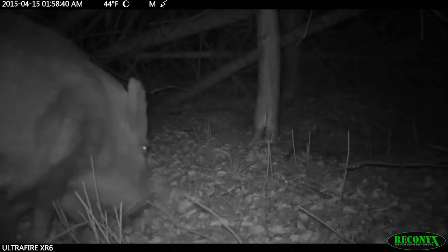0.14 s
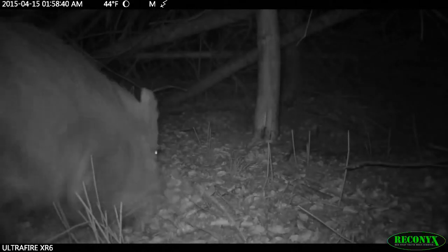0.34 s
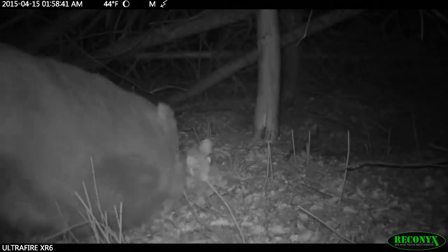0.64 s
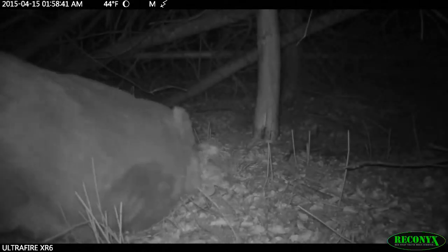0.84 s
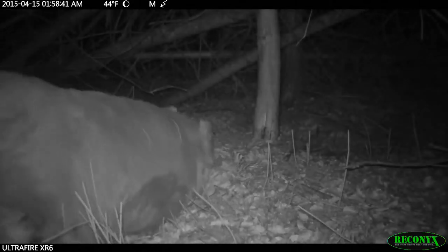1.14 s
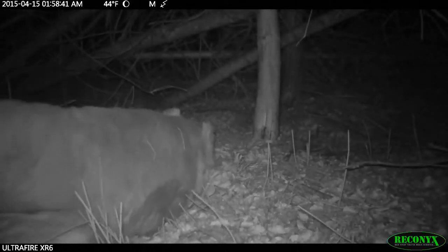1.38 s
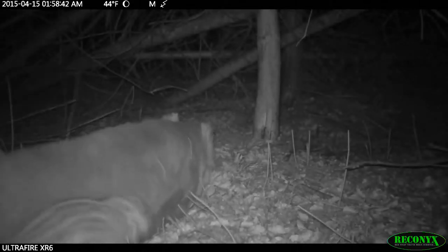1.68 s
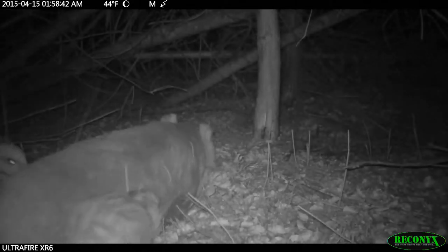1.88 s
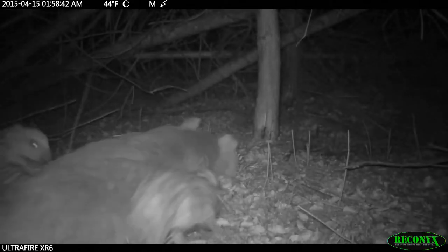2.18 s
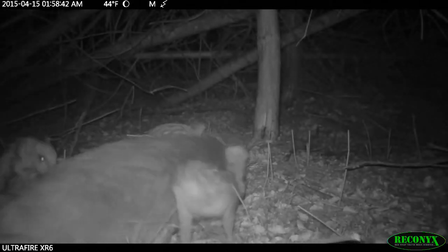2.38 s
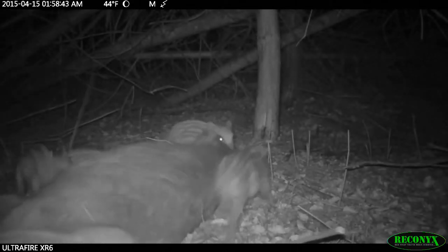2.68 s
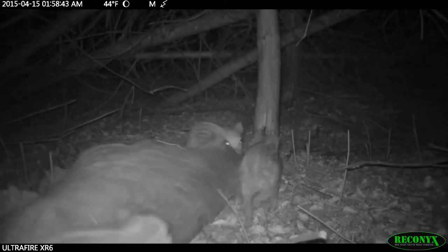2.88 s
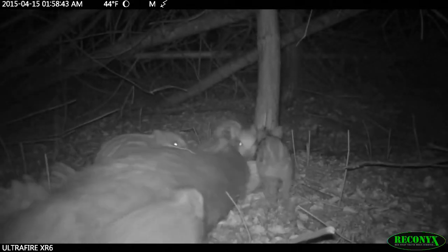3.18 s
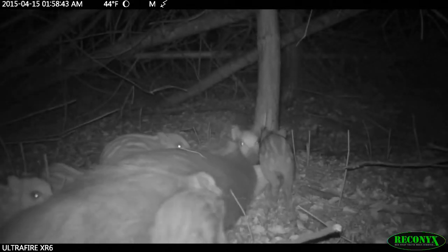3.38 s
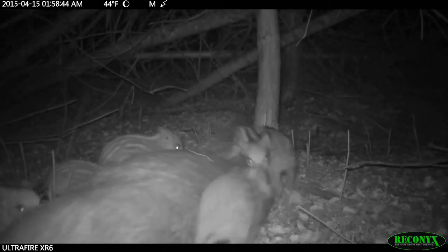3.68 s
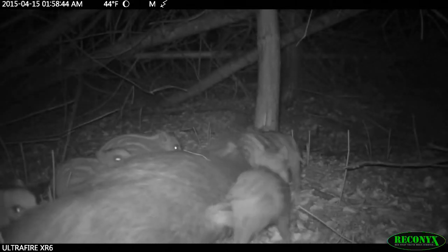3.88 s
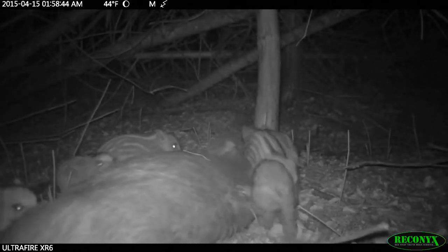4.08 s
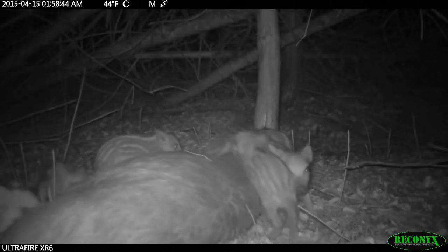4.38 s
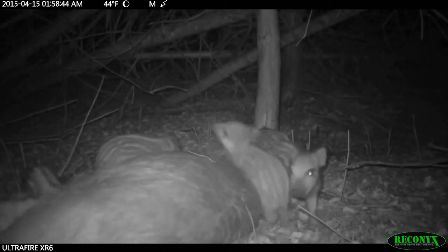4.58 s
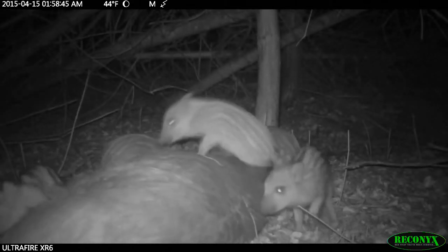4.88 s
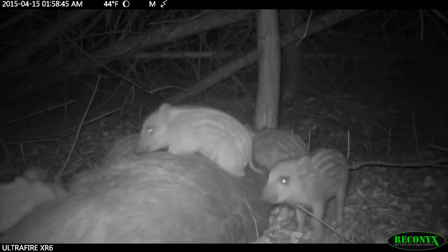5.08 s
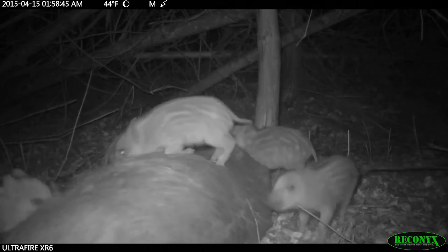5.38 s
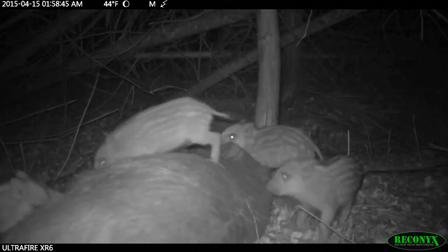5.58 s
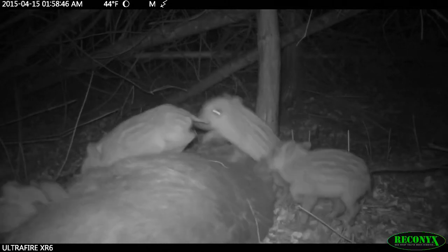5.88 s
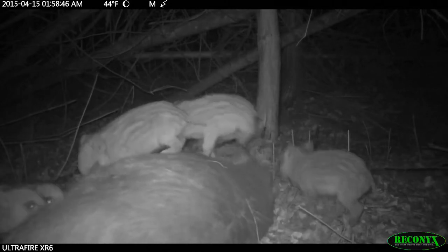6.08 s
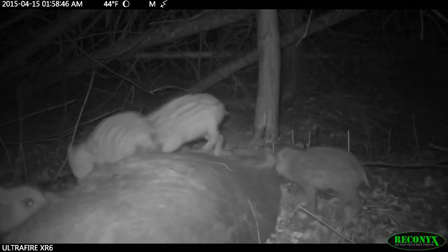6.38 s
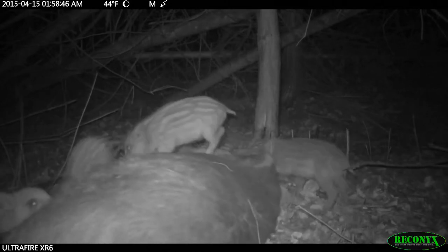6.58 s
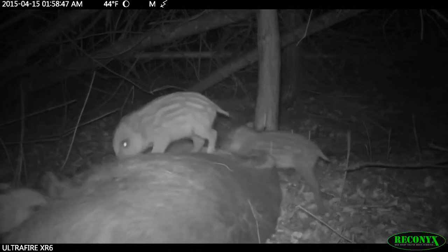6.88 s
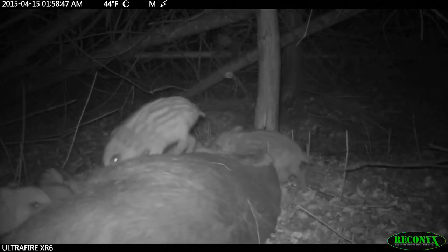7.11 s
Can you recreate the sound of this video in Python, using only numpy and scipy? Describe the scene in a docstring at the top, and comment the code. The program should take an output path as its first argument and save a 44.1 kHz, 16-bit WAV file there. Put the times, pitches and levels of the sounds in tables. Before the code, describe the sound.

Close, bright rustling of dry leaves as wild pigs root and settle on a forest floor. Hooves crush leaves in abrupt bursts and brittle twigs crack, busiest in the middle and harsh at the loudest peaks. Faint throaty sow grunts come in brief pulses early, with a slower creaky one late. Activity falls to scattered rustles and ticks over constant hiss and low air noise, with only a very short woodland tail.

```python
"""A wood at night: a sow and her piglets shuffle through dry leaves a step from a two-port microphone.
Leaves are thousands of snaps of a cycle or two; hooves crush many at once, in crunches that stop short.
Twigs break as ring, fizz, knock and splinters. The sow grunts low: fold pulses ring chest and throat.
Ground, bodies and trunks add a short scattered tail; slow air and circuit hiss lie beneath."""
import sys
import numpy as np
from scipy import signal
from scipy.fft import rfft, irfft
from scipy.io import wavfile
from scipy.ndimage import uniform_filter1d

SR = 44100
rng = np.random.default_rng(int(sys.argv[2]) if len(sys.argv) > 2 else 0)


def file_out(sig):
    """Save sig as 16-bit WAV at sys.argv[1]."""
    # one column per channel
    cols = np.atleast_2d(sig).T
    # limit, then scale
    lim = np.clip(cols, -1, 1)
    pcm = np.round(lim * 32767).astype(np.int16)
    wavfile.write(sys.argv[1], SR, pcm)


N = 319725

# shuffles of hooves and snouts: (time of height [s], level [dB], time to sink 10 dB [s], at least 0.01)
SHUFFLES = [(.13, -19.5, 0.12), (0.401, -19, 0.19), (.59, -19.5, 0.27), (.71, -18.5, -0.13),
            (.85, -16, 0.1), (.95, -16, -0.17), (1.25, -22, 0.26), (1.48, -15.5, 0.07), (1.7, -14.5, 0.19),
            (1.8, -19.5, 0.19), (1.924, -18.5, 0.02), (2.03, -20, 0.32), (2.28, -14.5, 0.16),
            (2.488, -10.5, 0.0154), (2.539, -14.5, 0.19), (2.76, -21.5, 0.1), (2.83, -16, 0.14),
            (2.89, -14, 0), (3.052, -15, 0.04), (3.2, -12.5, 0.0331), (3.331, -16.5, 0.01),
            (3.54, -18, 0.06), (3.75, -12.5, 0.0645), (3.89, -19, 0.08), (3.95, -19.5, 0.07),
            (4.06, -24.5, 0), (4.21, -25.5, 0.09), (4.44, -30.5, 0.25), (4.598, -20.5, 0.06),
            (4.84, -27, 0.28), (4.93, -25, 0.08), (5.265, -27, 0.13), (5.58, -29.5, 0.12), (5.71, -29, 0.1),
            (5.82, -21.5, 0.04), (6.0, -24, 0.055), (6.41, -32, 0.07), (6.6, -28.5, 0.03),
            (6.78, -28, 0.16), (7.2, -27.5, 0)]
# small stirring that never stops, dying down as the herd settles: (time [s], level [dB])
STIRRING_BED = [(0, -25), (.2, -23), (.33, -26.5), (1.15, -23.5), (1.4, -31), (3.25, -24.5), (3.44, -27),
                (4.7, -33), (5.1, -27.5), (5.45, -32.5), (6.25, -29.5), (6.5, -35), (7.05, -39.5),
                (7.25, -34)]
# where the stirring is: (time [s], left minus right [dB], lead of the left port [us])
STIRRING_PLACE = [(0, -2, 66), (1.5, -1.5, 58.5), (2.9, 0.2, 51), (3.1, 0, 5), (4.04, 0.5, 1.5),
                  (4.7, 0, 6.5), (5.0, -1, 57), (6.0, 0, 42), (6.9, -0.5, 28), (7.25, -.5, -6)]
# thinnest leaf snaps: (time [s], level [dB])
THIN_SNAPS = [(0, 0.5), (1.5, 0.5), (4, -3), (4.8, -1.5), (7.25, -4)]
# leaf litter's colour with the housing's ring: (frequency [Hz], relative level [dB per Hz])
LITTER_COLOUR = [(110, -56.5), (170, -20), (360, -19), (800, -23.5), (1540, -14), (2270, -17.5),
                 (2860, -12), (3620, -13.5), (4650, -10), (5900, -2), (6600, 0.5), (7800, -3.5),
                 (10100, -11), (14600, -15), (15500, -22)]
# crunches under hooves: (time [s], level [dB], weight of the thick snaps [dB])
CRUNCHES = [(0.9017, -18, 1), (1.0984, -27, -14), (1.6773, -12, -8), (1.926, -5.5, -9.5),
            (2.3338, -4.5, -0.5), (2.4743, -4.5, -14), (2.843, -6, -10), (2.8689, 4, -4),
            (3.048, -7.5, -10), (3.0978, -6, -13), (3.1799, -7, -9), (3.321, -6.5, -5.5),
            (3.651, -12.5, -2.5), (3.7345, -4, -3), (3.8004, -3, 1), (3.927, -12, -6), (3.9443, -4.5, -6),
            (3.9805, -5, -5.5), (4.0313, -14.5, 2), (4.196, -13, -1), (4.299, -16, -6), (4.5489, -12, -1),
            (5.263, -11.5, 0), (5.742, -15.5, 2), (6.0677, -18.5, -12)]
# breaking twigs: (time [s], level [dB], ring [Hz], left minus right [dB], share of brittle fizz [0-1])
TWIGS = [(0.473, 1, 5850, 1.5, 0.3), (1.6787, 2, 6100, 3, 0), (1.708, 5, 6580, 2, 0.3),
         (1.8722, -7, 6720, -1.5, 0.1), (2.0749, -2, 6660, 4, 0.06), (2.0926, -11, 6550, 0, 0.3),
         (2.1033, -5, 6290, 2, 0.2), (2.1236, -4.5, 4480, -1, 0.5), (2.2535, -4.5, 9040, -2.5, 0.2),
         (2.3697, -6, 6160, 1, .3), (2.4874, -1, 6400, 1, 0), (2.812, -5, 7320, 3, 0.14),
         (2.8953, -5, 5510, 0, 0.1), (2.8999, -4, 6370, -1, .3), (3.0485, -1.5, 6460, 2, 0.05),
         (3.0634, -5, 6720, 1, 0.1), (3.0777, -1.5, 6300, -1, .1), (3.1053, -3.5, 6120, 6, .1),
         (3.1978, -2, 5830, 2, 0.15), (3.207, -2, 6290, 0, 0), (3.5772, -2, 6000, 2, 0.3),
         (3.6879, -4.5, 7060, 4, 0.4), (3.7355, 7, 6840, 1, 0.45), (3.8869, -9, 5940, 1, .3),
         (3.955, -3, 6980, 3, 0.2), (3.9931, -3, 5770, 4, .1), (4.2488, -10, 6460, 2, 0.3),
         (4.2722, -3.5, 6900, 1, 0.37), (4.5051, -6.5, 6260, 1, 0.3), (4.6137, -8, 5860, 2, 0.4),
         (4.8967, -2.5, 8200, -5, 0.47), (4.9462, -5, 6000, 6, 0.43), (5.0138, -6, 6030, 0, 0.7),
         (5.3097, -11, 10080, -2, 0.4), (5.6727, -14, 6170, 3, 0.04), (5.8303, -8, 5900, 0, 0.7),
         (5.9558, -8.5, 6120, -8, 0.44), (6.4356, -9.5, 6060, -9, 0.26), (6.7415, -16.5, 5770, 1, 0.3),
         (7.1961, -4, 5570, 6, 0.18), (7.1996, -10.5, 5700, 4, 0.05)]
# sow's grunts: (time [s], length [s], pulse rate [per s], level [dB], throat at onset [Hz],
# throat over chest before closing [dB])
GRUNTS = [(0.105, 0.11, 64, -39, 502, 0), (0.213, 0.041, 57, -47, 300, -11),
          (0.496, 0.047, 53, -45.5, 500, 4), (0.621, 0.059, 66, -44, 500, 7),
          (0.716, 0.034, 65, -53, 490, 19), (.91, 0.042, 70, -51.5, 500, 4),
          (1.052, 0.05, 66, -43.5, 505, 5), (1.152, .045, 100, -50, 476, 13),
          (1.303, 0.059, 69, -43.5, 490, 0), (1.466, 0.039, 69, -46.5, 455, 7),
          (1.539, .04, 80, -49.5, 398, 3), (1.891, 0.073, 75, -45.5, 473, 3),
          (1.997, 0.039, 62, -46, 490, 4), (2.298, 0.078, 58, -48, 384, 2),
          (2.428, 0.038, 50.2, -45.5, 414, 8), (2.584, 0.13, 53, -39, 510, -13),
          (2.872, 0.048, 50, -46, 383, 2), (3.06, 0.055, 54, -44, 413, 1), (4.15, .055, 67, -54, 425, 10),
          (4.368, 0.068, 57, -54, 414, 24), (5.557, .2, 24, -37, 450, -4),
          (6.346, 0.11, 60, -50.5, 404, -13)]
# chest modes: (nominal frequency [Hz], width [Hz], relative level [dB])
CHEST_MODES = [(55, 50, -9), (128, 38, 1), (215, 50, -5)]
# slow air: (frequency [Hz], relative level [dB per Hz])
AIR_COLOUR = [(1, -16), (25, -20), (45, -20.5), (90, -24), (110, -34.5), (200, -33.5), (500, -37.5),
              (700, -43)]
# circuit hiss: (frequency [Hz], relative level [dB per Hz])
HISS_COLOUR = [(150, -40), (230, -5.5), (450, -6), (800, -7.5), (2000, -12.5), (4000, -8), (6300, -3),
               (10000, -16), (15500, -8)]
# converter offset, one row per channel, left first: (offset [full scale])
CONVERTER_OFFSET = [
    [-.0406],
    [-.0265],
]

RISE_SHARE, ROUNDING = 0.48, 1.27  # swell time over sink time; power that rounds a shuffle's top
SNAPS_PER_S, THICK_DB = 26000, -2.5  # THICK_DB: weight of the thick low snaps
CRUNCH_RISE_S, CRUNCH_10DB_S = 0.0013, 0.0098  # a crunch holds, then stops short: 10 dB down by the latter
CRUNCH_THIN_DB = -2.5  # crushed leaves hold fewer of the thinnest snaps
TICKS_PER_S, TICK_OVER_STIR_DB, TICK_HZ = 45, 8, 6430  # small stems that tick by chance
FIZZ_BAND_HZ = (1790, 9200)
KNOCK_DB, KNOCK_DB_PER_DB = -23, 1.1  # louder break: thicker twig, heavier knock
SECOND_BEAT, GRUNT_FADE_DB = 0.45, -2
LITTER_TAIL_DB, TWIG_TAIL_DB, SOW_TAIL_DB = -5.5, -11, -5.5  # near twigs sound dry
TAP_SETS_PER_S = 23
AIR_DB, AIR_SHARED, HISS_DB, HISS_SHARED = -43.5, 0.58, -44, 0.042
BAND_LIMIT_HZ = 15600


def leaves(spread_db=0.46, clump_db=1.2, count=14):
    """Each leaf snaps for a cycle or two at a pitch set by its size; snaps come in clumps."""
    at = np.flatnonzero(rng.random(N) < SNAPS_PER_S / SR)
    size_db = spread_db * np.minimum(rng.exponential(1, len(at)), 5)
    size = gain_of(size_db) * rng.choice([-1., 1.], len(at))
    clumps_db = clump_db * wander(45.0) + 0.5 * wander(380.0)
    size *= gain_of(clumps_db)[at]
    size *= stir()[at] * np.sqrt(N / np.sum(size ** 2))
    kind = rng.integers(0, count, len(at))

    crunch_at, crunch_size, crunch_weight_db = crunches()
    crunch_at = np.minimum(crunch_at.astype(int), N - 1)
    side_db, lead_us = follow(STIRRING_PLACE), follow(STIRRING_PLACE, column=2)
    thin_db = follow(THIN_SNAPS)
    pitches_hz = np.geomspace(250, 15000, count)
    snaps = np.array([leaf_snap(hz) for hz in pitches_hz])
    out = np.zeros((2, N))
    for k, (hz, snap) in enumerate(zip(pitches_hz, snaps)):
        thick, thin = float(hz < 3000), float(hz > 7500)
        scatter_us = 320. if hz < 750 else 18.  # the dullest snaps reach each port by its own way
        mine = at[kind == k]
        # leaves of one size come and go underfoot
        patch_db = (1.48 + 1.2 * thick) * wander(10.8)[mine] + thin * thin_db[mine]
        snap_size = size[kind == k] * gain_of(patch_db + thick * THICK_DB)
        train = to_ports(mine, snap_size, side_db[mine], lead_us, scatter_us)
        share = rng.uniform(0.025, 0.44, len(crunch_size)) * rng.choice([-1., 1.], len(crunch_size))
        crushed = crunch_size * share * gain_of(thick * crunch_weight_db + thin * CRUNCH_THIN_DB)
        train += to_ports(crunch_at, crushed, side_db[crunch_at], lead_us, scatter_us)
        out += signal.oaconvolve(train, snap[None], axes=1)[:, :N]
    return signal.oaconvolve(out, litter_filter(snaps)[None], axes=1)[:, :N]


def leaf_snap(hz):
    """One leaf: a fast-damped sine of a cycle or two."""
    t = np.arange(1024) / SR
    return evened(t * np.exp(-2.2 * hz * t) * np.sin(2 * np.pi * hz * t + 1)) / 32


def litter_filter(snaps):
    """Gives the sum of all leaf sizes the colour of the litter as the housing passes it."""
    hz = np.fft.rfftfreq(8192, 1 / SR)
    summed = np.sqrt(np.mean(abs(rfft(snaps, 8192)) ** 2, axis=0))
    colour = gain_of(read(LITTER_COLOUR, hz))
    band = (hz > 3500) & (hz < 12000)
    colour /= np.sqrt(np.sum(colour[band] ** 2) / len(hz))
    return causal(colour / summed)


def stir():
    """Stirring strength: every shuffle swells quickly and sinks slowly over the bed."""
    t, power = np.arange(0, N / SR, .002), 0
    for s, level_db, sink_s in SHUFFLES:
        away = np.where(t < s, (s - t) / RISE_SHARE, t - s) / max(sink_s, .01)
        power = power + gain_of(level_db - 10 * away ** ROUNDING) ** 2
    return np.sqrt(np.interp(np.arange(N) / SR, t, power) + gain_of(follow(STIRRING_BED)) ** 2)


def crunches():
    """A quick burst of splinters that stops short, as (sample, size, weight [dB])."""
    parts, n = [], np.arange(1200)
    t = n / SR
    for s, level_db, weight_db in CRUNCHES:
        size, chance = rng.standard_normal((2, len(n)))
        ticks = (evened(uniform_filter1d(chance, size=50)) > .45) | (n < 80)  # the first tick is sure
        rise = 1 - np.exp(-t / CRUNCH_RISE_S)
        shape = rise * gain_of(level_db - 10 * (t / CRUNCH_10DB_S) ** 2)
        parts.append([n + round(s * SR), shape * size * ticks, weight_db + 0 * n])
    return np.concatenate(parts, axis=1)


def to_ports(at, size, side_db, lead_us, scatter_us):
    """Clicks from scattered places reach the two ports at different times and levels."""
    at = np.minimum(at, N - 1)
    late = (lead_us[at] + scatter_us * rng.standard_normal(len(at))) * SR / 10 ** 6
    dithered = np.floor(late + rng.random(len(at))).astype(int)  # whole samples, right on average
    right = np.clip(at + dithered, 0, N - 1)
    tilt = gain_of(side_db / 2)
    return np.array([np.bincount(at, size * tilt, N), np.bincount(right, size / tilt, N)])


def twigs():
    """Each break reaches the ports at its own level and a third of the stirring's delay."""
    out = np.zeros((2, N + 2048))
    turns_per_us = np.fft.rfftfreq(2048, 1 / SR) * 1e-6
    place_s, _, lead_us = np.transpose(STIRRING_PLACE)
    for s, level_db, hz, side_db, brittle in [*TWIGS, *stem_ticks()]:
        sound = twig_break(level_db, hz, np.clip(brittle, 0, 1))
        # twigs lie nearer the middle than the stirring
        late_us = np.interp(s, place_s, lead_us) / 3
        later = irfft(rfft(sound) * np.exp(-2j * np.pi * turns_per_us * late_us))
        at = round(s * SR)
        port_db = level_db + np.array([[side_db], [-side_db]]) / 2
        out[:, at:at + len(sound)] += gain_of(port_db) * [sound, later]
    return out[:, :N]


def stem_ticks():
    """Small stems tick at chance times, louder where the stirring is; rows as in TWIGS."""
    when = np.sort(rng.uniform(0, N / SR, round(TICKS_PER_S * N / SR)))
    luck = rng.standard_normal((len(when), 3))
    stir_db = 20 * np.log10(stir()[(when * SR).astype(int)])
    level_db = stir_db + TICK_OVER_STIR_DB + 1.7 * luck[:, 0]
    hz, side_db = TICK_HZ * (1 + .08 * luck[:, 1]), 2.2 * luck[:, 2]
    return np.c_[when, level_db, hz, side_db, rng.uniform(0, .6, len(when))]


def twig_break(level_db, hz, brittle):
    """A ring of a millisecond, a broad brittle fizz, a dull knock and a few splinters."""
    t = np.arange(2048) / SR
    draw = rng.standard_normal((4, len(t)))
    crack = t ** 2 * np.exp(-t / 0.00023) * np.sin(2 * np.pi * hz * t)
    fizz = np.diff(t * np.exp(-t / 0.00034) * draw[0], prepend=0)
    fizz += t * np.exp(-t / 0.00039) * draw[0]
    fizz = signal.lfilter(*signal.butter(1, FIZZ_BAND_HZ, "band", fs=SR), fizz)
    knock = signal.lfilter([.3], [1, -.75], np.exp(-t / 0.0018) * draw[1])
    splinters = ring(np.exp(-t / 0.0028) * draw[2] * (draw[3] > 1.75), hz, 1500.)
    sound = (1 - brittle) * crack / crack.max() + brittle * 1.5 * fizz / abs(fizz).max()
    return sound + 0.091 * splinters + gain_of(KNOCK_DB + KNOCK_DB_PER_DB * level_db) * knock


def grunts():
    """Fold pulses ring the chest and a throat that drops and dulls as the mouth shuts."""
    out = np.zeros(N)
    for s, length_s, rate, level_db, throat_hz, mouth_db in GRUNTS:
        n = round((length_s + .08) * SR)  # 0.08 s for the ring to die
        done = np.clip(np.arange(n) / SR / length_s, 0, 1)
        pulses = fold_pulses(n, length_s, rate, done)
        chest = sum(gain_of(mode_db) * ring(pulses, hz * (1.05 - 0.061 * done), width_hz)
                    for hz, width_hz, mode_db in CHEST_MODES)
        throat_now_hz = throat_hz * (1 - 0.17 * done)
        throat = evened(ring(ring(pulses, throat_now_hz, 160.0), throat_now_hz, 160.0))
        throat *= gain_of(mouth_db - 25 * (done - .3) ** 2)
        out[round(s * SR):][:n] += gain_of(level_db) * evened(evened(chest) + throat)
    return out * gain_of([[1.2], [-1.2]])


def fold_pulses(n, length_s, rate, done):
    """Slow, uneven pulses of the vocal folds, each with a weaker second beat, and leaking air."""
    beats = np.arange(int(length_s * rate) + 1)
    chance = rng.standard_normal((40, 2))[:len(beats)]
    pulses = np.zeros(n)
    for offset, strength in ((0, 0.73), (.63, SECOND_BEAT)):
        at = (beats + offset) / rate + .0012 * chance[:, 0] * (beats > 0)  # jitter spares the first
        swell = .6 + .4 * np.sin(np.pi * np.clip(at / length_s, 0, 1) ** .6)
        push = strength * swell * (at < length_s) * gain_of(1.5 * chance[:, 1])
        push *= np.clip(4 * at / length_s, 0, 1) if offset else 1  # the second beat creeps in
        push *= gain_of(GRUNT_FADE_DB * (at / length_s) ** 2)
        np.add.at(pulses, np.clip(at * SR, 0, n - 1).astype(int), -push)
    pulses += .0004 * rate * np.sin(np.pi * done) * rng.standard_normal(n)  # air leaks past the folds
    return np.convolve(pulses, signal.windows.hann(64))[:n]


def woods(x, t60_s, count=9):
    """A short scattered tail, its echo pattern crossfading steadily through several random sets."""
    out, turn = 0, np.arange(N) / SR * TAP_SETS_PER_S
    for k in range(count):
        taps = np.zeros((2, 6000))
        at = np.arange(20, 5980, 20) + rng.integers(0, 20, (2, 298))
        np.put_along_axis(taps, at, rng.choice([-1., 1.], at.shape), 1)
        taps *= gain_of(-60 * np.arange(6000) / SR / t60_s)
        taps /= np.linalg.norm(taps, axis=1)[:, None]
        # rotating the sets breaks up steady comb lines
        gap = np.clip(((turn - k) % count) - 1, -1, 1)
        out = out + signal.oaconvolve(x * np.cos(np.pi / 2 * gap), taps, axes=1)[:, :N]
    return out


def slow_air():
    """Low noise, partly shared by the ports, whose level wanders."""
    level_db = AIR_DB + 3.5 * wander(3.3) + np.array([[.8], [-.8]])
    return gain_of(level_db) * coloured(AIR_COLOUR, AIR_SHARED)


def circuit_hiss():
    """Steady circuit noise, almost independent in the two channels."""
    return gain_of(HISS_DB) * coloured(HISS_COLOUR, HISS_SHARED)


def coloured(points, shared):
    """Two channels of noise with a shared part and rms 1."""
    a, b = rng.standard_normal((2, N))
    z = rfft(np.array([a, shared * a + np.sqrt(1 - min(shared, 1) ** 2) * b]))
    return evened(irfft(z * gain_of(read(points, np.fft.rfftfreq(N, 1 / SR))), N))


def wander(cutoff_hz):
    """Low-passed chance with rms 1."""
    lowpass = signal.butter(2, cutoff_hz, fs=SR, output="sos")
    return evened(signal.sosfilt(lowpass, rng.standard_normal(N + SR))[SR:])


def ring(x, hz, width_hz):
    """A mode struck by clicks; its pitch may move."""
    turn = np.exp(2j * np.pi * np.cumsum(hz * np.ones(len(x))) / SR)
    decay = np.exp(-np.pi * width_hz / SR)
    return (turn * signal.lfilter([1], [1, -decay], x / turn)).imag


def causal(gain, size=4096):
    """Minimum-phase impulse response: starts at once and has the given gain."""
    log_gain = np.log(np.maximum(np.r_[gain, gain[-2:0:-1]], 1e-5))
    return np.fft.ifft(np.exp(log_gain - 1j * signal.hilbert(log_gain).imag)).real[:size]


def read(points, hz):
    """A spectrum table on a log-frequency axis."""
    f, value = np.transpose(points)
    return np.interp(np.log(hz + 1), np.log(f + 1), value)


def follow(rows, column=1):
    """One column of a time table at every sample."""
    table = np.array(rows, float)
    return np.interp(np.arange(N) / SR, table[:, 0], table[:, column])


def gain_of(db):
    """Amplitude factor of a level in dB."""
    return 10 ** (np.asarray(db) / 20)


def evened(x):
    """Scales to rms 1."""
    return x / np.sqrt(np.mean(x ** 2) + 1e-20)


def scene():
    """Leaves, twigs and grunts with their scatter, over air and hiss."""
    litter, breaks, sow = leaves(), twigs(), grunts()
    upper = signal.lfilter(*signal.butter(2, 300, "high", fs=SR), sow)  # trunks scatter little bass
    scatter = woods(gain_of(LITTER_TAIL_DB) * litter + gain_of(TWIG_TAIL_DB) * breaks, t60_s=0.053)
    scatter += gain_of(SOW_TAIL_DB) * woods(upper, t60_s=0.07, count=3)
    return litter + breaks + sow + scatter + slow_air() + circuit_hiss()


def record(dry):
    """Converter offset, hard clipping at full scale, the band limit, and clipping again."""
    edge = signal.firwin(511, BAND_LIMIT_HZ, window=("kaiser", 9), fs=SR)
    clipped = np.clip(dry + np.array(CONVERTER_OFFSET), -1, 1)
    return np.clip(signal.oaconvolve(clipped, edge[None], "same", axes=1), -1, 1)


dry = scene()
out = record(dry)
file_out(out)
```